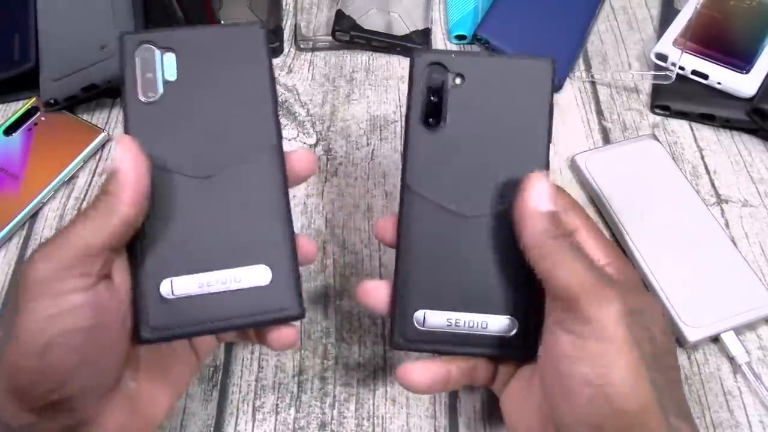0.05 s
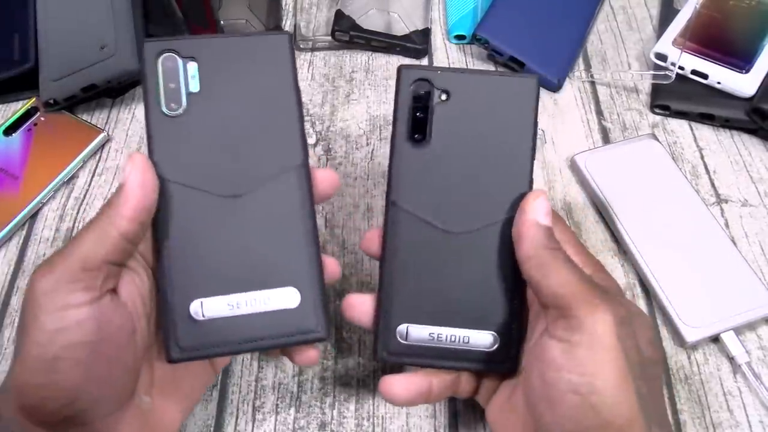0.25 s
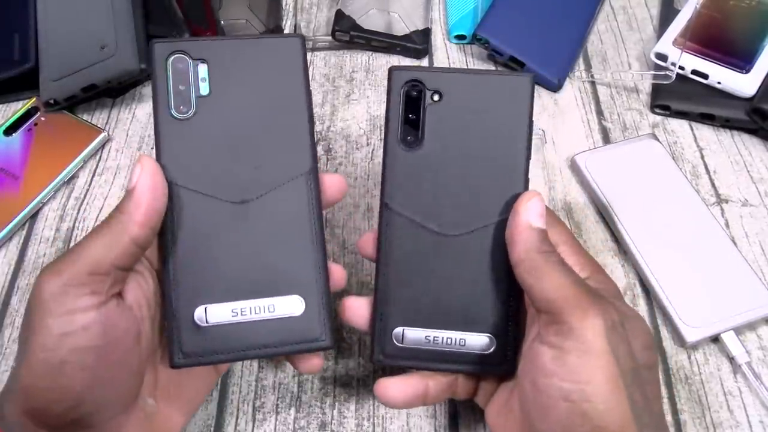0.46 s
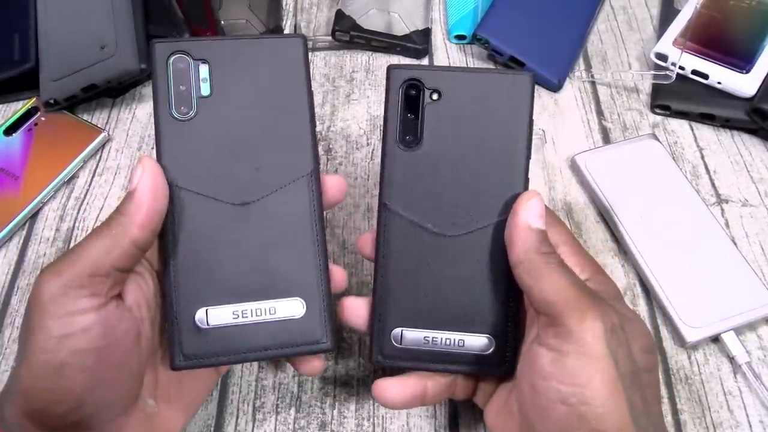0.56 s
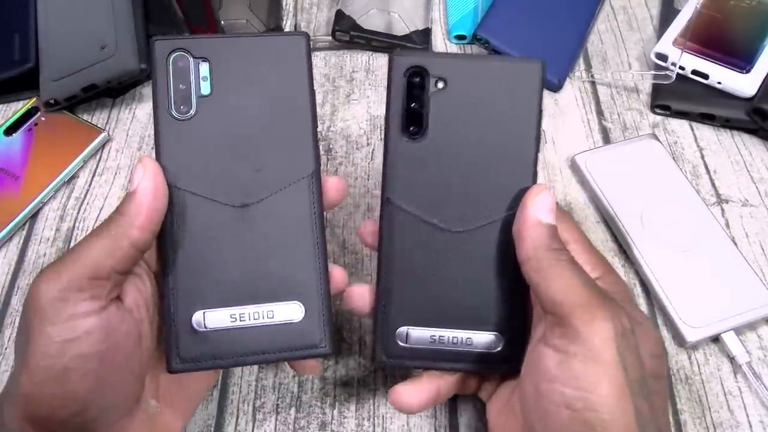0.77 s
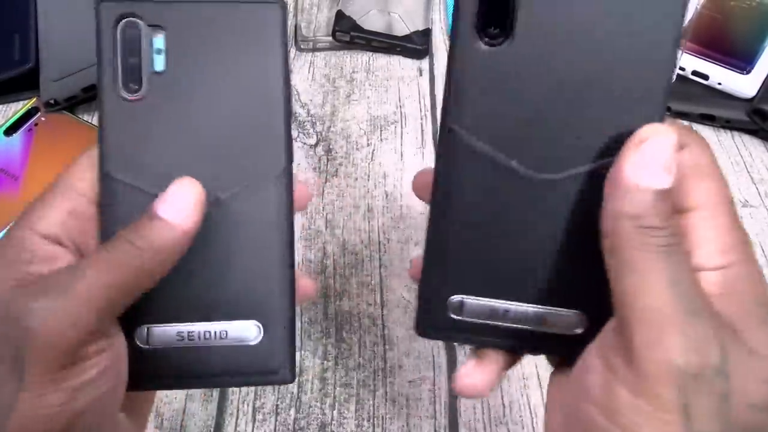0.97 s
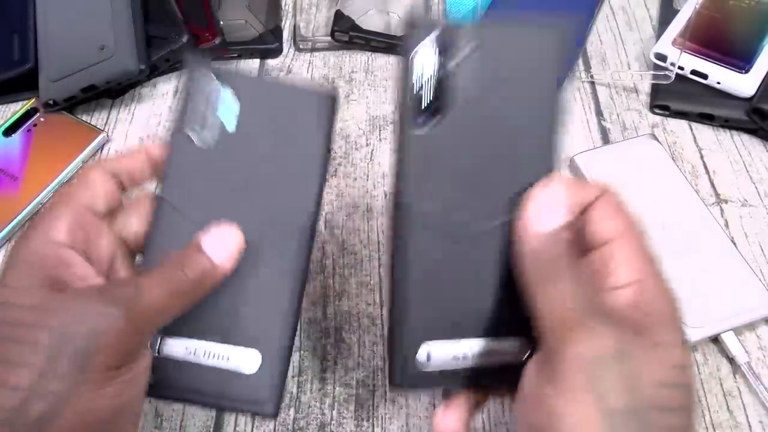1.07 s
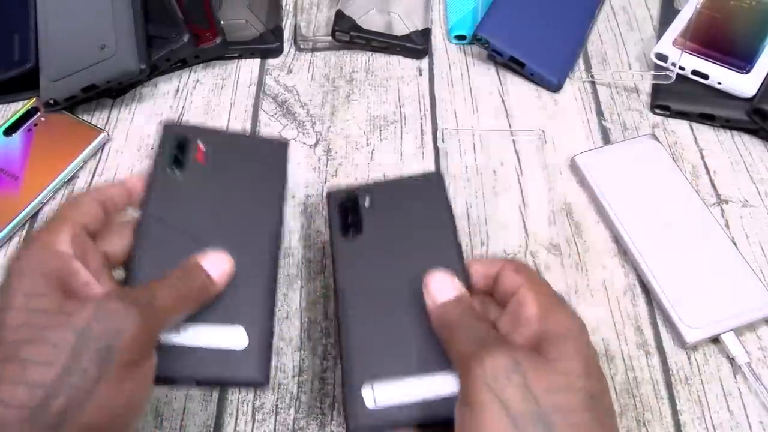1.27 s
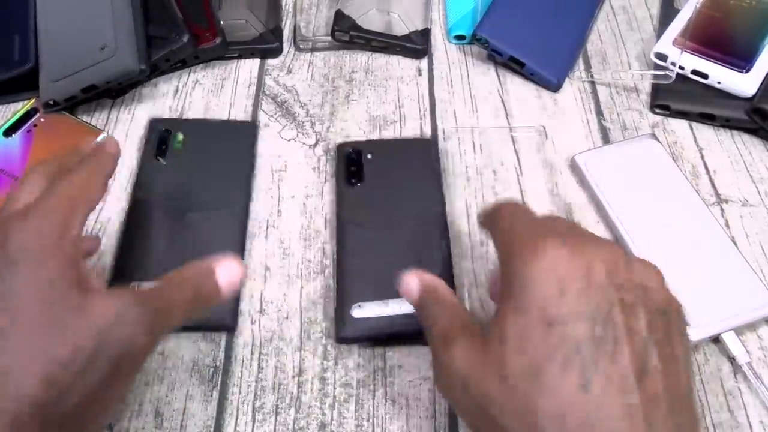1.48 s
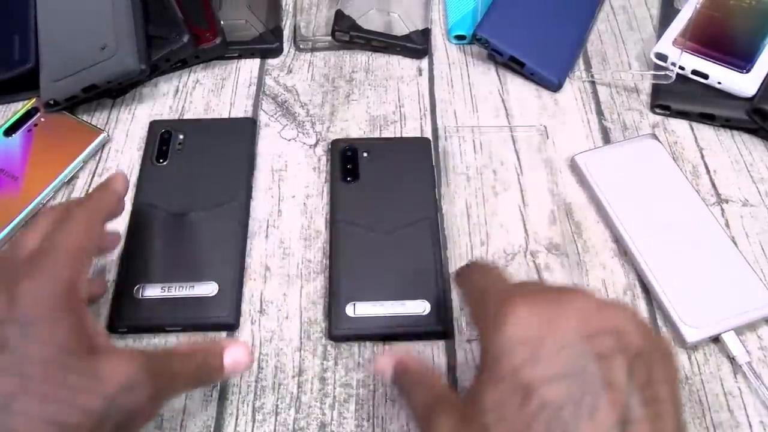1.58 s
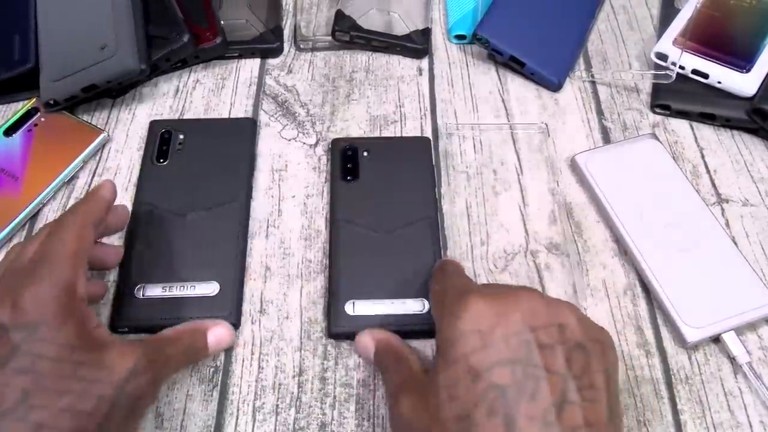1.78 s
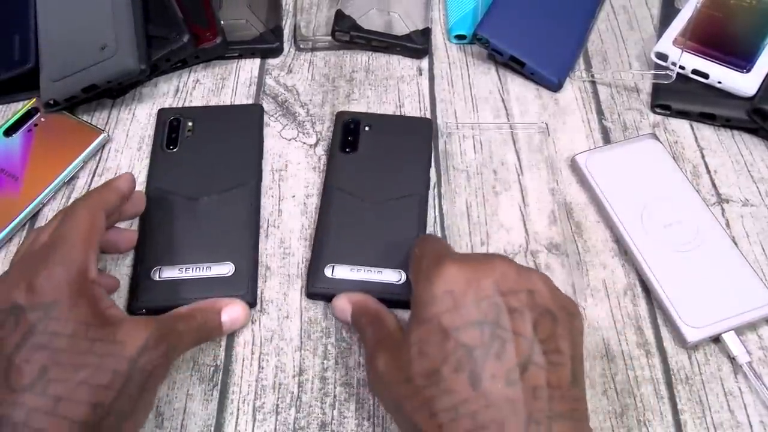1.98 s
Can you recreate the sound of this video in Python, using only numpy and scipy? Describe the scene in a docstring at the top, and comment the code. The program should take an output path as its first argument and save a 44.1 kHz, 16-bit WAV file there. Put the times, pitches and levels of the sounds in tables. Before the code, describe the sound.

Two cased phones thump onto a wooden table, close up in a small, quiet room. First come faint plastic ticks and finger rubs, with two soft vibration buzzes around 0.4 to 0.6 seconds. Small creaks and light touches follow near 1 second. At 1.5 seconds one phone drops with a loud, rattling thump, the other right behind. A low wobble and faint metallic ring linger as fingers slide off.

```python
"""Close up in a small, quiet room, two phones in plastic cases tick and rub as hands turn them over.
One gives a double buzz of its vibration motor. They are lowered to a wooden table and touch it lightly.
At 1.5 s one slips from the fingers and drops flat with a rattling thump, and the other follows;
a limiter ducks the blows. The microphone stand wobbles, a faint metallic ring lingers,
and fingers slide off the cases."""
import sys
import numpy as np
from scipy import signal
from scipy.fft import rfft, irfft, next_fast_len
from scipy.io import wavfile
from scipy.ndimage import uniform_filter1d

SR = 44100
rng = np.random.default_rng(int(sys.argv[2]) if len(sys.argv) > 2 else 0)


def int16_out(signal):
    """Quantize to a 16-bit WAV file."""
    q = np.round(np.clip(np.atleast_2d(signal).T, -1, 1) * 32767)
    wavfile.write(sys.argv[1], SR, q.astype(np.int16))


N = 89831
T = np.arange(N) / SR


def from_db(db):
    """Decibels to gain."""
    return 10 ** (np.asarray(db) / 20)


def unit_rms(x):
    """Scale to rms 1."""
    return x / np.sqrt(np.mean(x ** 2) + 1e-20)


def equalise(x, curve):
    """Minimum-phase EQ along a (Hz, dB) curve."""
    size = next_fast_len(2 * len(x))
    hz, db = np.transpose(curve)
    grid = np.maximum(np.fft.rfftfreq(size, 1 / SR), 1)
    gain = from_db(np.interp(np.log(grid), np.log(hz), db))
    cepstrum = irfft(np.log(gain), size)
    cepstrum[1:size // 2] *= 2   # folded onto positive time: no pre-ring
    cepstrum[size // 2 + 1:] = 0
    return irfft(rfft(x, size) * np.exp(rfft(cepstrum)), size)[:len(x)]


def bandpass(x, hz, width_hz):
    """One resonance with gain 1 at its peak."""
    r = np.exp(-np.pi * width_hz / SR)
    feedback = [1, -2 * r * np.cos(2 * np.pi * hz / SR), r * r]
    return signal.lfilter(np.array([1, 0, -1]) * (1 - r * r) / 2, feedback, x)


def shaped_noise(curve):
    """Noise through an EQ curve and a 16 Hz low cut; rms 1."""
    low_cut = signal.butter(2, 16, "high", fs=SR, output="sos")
    return unit_rms(signal.sosfilt(low_cut, equalise(rng.standard_normal(N), curve)))


def band(x, hz, width_hz):
    """Two passes through the same resonance; rms 1."""
    return unit_rms(bandpass(bandpass(x, hz, width_hz), hz, width_hz))


def decay(start, t60):
    """Envelope that jumps to 1 and dies away."""
    return (T >= start) * from_db(-60 * np.clip((T - start) / t60, 0, 10))


def swell(peak, rise, fall):
    """Round-topped envelope, 9 dB down at `rise` seconds before its peak and `fall` seconds after."""
    return np.exp(-np.abs((T - peak) / np.where(T < peak, rise, fall)) ** 1.71)


# Tone of the background bed: (frequency [Hz], relative level [dB])
ROOM_TONE_EQ = [(12, -24), (20, 1), (70, -10), (113, -7), (270, -17.5), (513, -29.5), (718, -29.5),
                (825, -38), (1060, -32), (1960, -38.5), (16000, -45)]


def room_tone():
    """A low, steady bed of noise with a faint whine."""
    whine = from_db(-72.5) * np.sin(2 * np.pi * 748 * T)
    return from_db(-51) * shaped_noise(ROOM_TONE_EQ) + whine


# Ticks of the cases: (time [s], level [dB], centre [Hz])
CASE_TICKS = [(0.0176, -32.5, 8800), (0.2259, -39, 3200), (0.274, -39.5, 1900), (0.2746, -36.5, 4750),
              (0.832, -47, 4630), (0.9286, -32, 4370), (0.9341, -31, 4300), (.9390, -40, 6470),
              (.9445, -42, 5470), (0.966, -37, 1940), (1.0427, -37, 5170), (1.1055, -39.5, 7400),
              (1.635, -36.5, 3320)]


def case_ticks():
    """Tiny broad snaps of a case shifting against its phone; a quick run of them is a creak."""
    snap = rng.standard_normal(N)
    return sum(from_db(db) * band(snap, hz, width_hz=1.1 * hz) * decay(start, t60=0.006)
               for start, db, hz in CASE_TICKS)


# Finger strokes on a case: (peak time [s], level [dB], rise [s], fall [s], tilt [dB/octave])
STROKES = [(.05, -52.5, 0.061, 0.042, 1.6), (0.189, -58, 0.1, 0.15, -2.5),
           (0.924, -44, 0.056, 0.071, -0.53), (1.05, -56, 0.05, 0.082, -4.5),
           (1.146, -46, 0.018, 0.033, -0.5), (1.331, -52, 0.19, 0.09, -2), (1.415, -60, 0.019, 0.013, 1),
           (1.498, -51, 0.025, 0.018, 1), (1.79, -52.5, 0.091, 0.1, -3), (1.9, -49, 0.041, 0.021, -3),
           (1.978, -44.5, 0.058, 0.027, -1.6), (2.03, -42, .035, 0.077, -4.5)]
# Tone of skin on plastic: (frequency [Hz], relative level [dB])
SKIN_EQ = [(100, -3.5), (430, 5), (750, -4.5), (1300, 0.5), (2200, -0.5), (3700, -0.5), (5000, 1),
           (7500, -2), (10500, 1), (13000, -4), (15800, -9.5)]
SLIPS_PER_S, SLIP_SPREAD_DB, SLIP_MIX, FLUTTER_DB = 1500, 2, 0.73, 2.5


def finger_rubs():
    """Skin friction: fluttering hiss and a grain of tiny slips swell with each stroke."""
    slips = (rng.random(N) < SLIPS_PER_S / SR) * rng.choice([-1, 1], N)
    slips = slips * from_db(SLIP_SPREAD_DB * np.minimum(rng.exponential(1, N), 4))
    wander = unit_rms(uniform_filter1d(rng.standard_normal(N), size=500))
    friction = from_db(FLUTTER_DB * wander) * (rng.standard_normal(N) + SLIP_MIX * unit_rms(slips))
    rubs = 0
    for peak, db, rise, fall, tilt in STROKES:
        curve = [(hz, level + tilt * np.log2(hz)) for hz, level in SKIN_EQ]
        rubs = rubs + from_db(db) * swell(peak, rise, fall) * unit_rms(equalise(friction, curve))
    return rubs


# Tone of the reverb: (frequency [Hz], relative level [dB])
REVERB_EQ = [(40, -29), (120, -8), (450, -2), (1000, -4.5), (4000, -12), (16000, -10.5)]


def room_reverb(x):
    """Short diffuse reflections of a furnished room, wet only."""
    tail = shaped_noise(REVERB_EQ) * decay(start=0.005, t60=0.12)
    return from_db(-15.5) * signal.fftconvolve(x, tail / np.sqrt(np.sum(tail ** 2)))[:N]


# Pulses of the motor: (time [s], length [s])
MOTOR_PULSES = [(0.398, 0.082), (0.516, 0.0834)]
# Its harmonics: (harmonic number, relative level [dB])
MOTOR_HARMONICS = [(1, -1.5), (2, -21), (3, -27)]
MOTOR_HZ, MOTOR_RAMP_S = 158, 0.016


def motor_buzz():
    """Two steady pulses of a vibration motor, with a faint rattle once a cycle."""
    gate = sum(np.clip((T - start) / MOTOR_RAMP_S, 0, 1)
               * np.clip((start + length - T) / MOTOR_RAMP_S + 0.5, 0, 1)
               for start, length in MOTOR_PULSES)
    phase = 2 * np.pi * MOTOR_HZ * T
    tone = sum(from_db(db) * np.sin(k * phase) for k, db in MOTOR_HARMONICS)
    pulsed_noise = rng.standard_normal(N) * np.maximum(np.sin(phase), 0)
    rattle = unit_rms(bandpass(pulsed_noise, hz=1900, width_hz=470))
    return gate * (from_db(-40.5) * tone + from_db(-71) * rattle)


# Hands jostle the table: (peak time [s], level [dB], rise [s], fall [s])
HAND_MOVES = [(1.061, -45, 0.15, 0.22), (2.0, -39.5, 0.34, .05)]
# Tone of their rumble: (frequency [Hz], relative level [dB])
RUMBLE_EQ = [(20, -4), (40, 13), (70, -18), (120, -16), (200, -14), (350, -23), (700, -20), (2000, -64)]


def hand_rumble():
    """Dull rumble as hands and wrists move on the table."""
    envelope = sum(from_db(db) * swell(peak, rise, fall) for peak, db, rise, fall in HAND_MOVES)
    return shaped_noise(RUMBLE_EQ) * envelope


# Cases hit the table: (time [s], thump drive [dB], contact cut-off [Hz], clack [dB], stand drive [dB])
HITS = [(0.963, -48.5, 800, -37, -61), (1.124, -40.5, 900, -56, -61), (1.1298, -38.5, 910, -50, -55),
        (1.1872, -35.5, 1000, -39, -26), (1.5060, 7, 414, -11, -43), (1.5249, 4.5, 1130, -5, -28),
        (1.5323, -39, 894, -32.5, 3), (1.541, 3.5, 1400, -5, -31.5), (1.5481, 12.5, 120, -32, -2.5),
        (1.5802, -2, 203, -31.5, -13), (1.6150, -13.5, 214, -69, -29), (1.6293, -12.5, 391, -46, -40.3),
        (1.6343, -0.5, 640, -25.5, -55), (1.6419, -11.5, 816, -37, -3), (1.6733, -4.5, 135, -67, -38),
        (1.93, -25.5, 99, -79, -55)]


def contact_forces():
    """One force pulse of unit area per hit; a softer contact lasts longer and sounds duller."""
    age = np.array([np.clip((T - start) * 2 * np.pi * hz, 0, 60) for start, _, hz, _, _ in HITS])
    pulses = age * np.exp(-age)
    return pulses / pulses.sum(axis=1, keepdims=True)


def ring(force, hz, t60):
    """One mode: a unit click starts a decaying sine of height 1."""
    r, w = from_db(-60 / (t60 * SR)), 2 * np.pi * hz / SR
    return signal.lfilter([0, np.sin(w)], [1, -2 * r * np.cos(w), r * r], force + 1e-18)


# Modes of the wooden top: (frequency [Hz], gain [dB], t60 [s])
TOP_MODES = [(144, -9.5, 0.11), (193.7, -13.5, 0.15), (235, 8, 0.039), (261.7, -21.5, 0.33),
             (285.9, 6, 0.065), (370.6, -0.5, 0.077), (420, -15.5, 0.16), (457, -8.5, 0.095),
             (679, -19.5, 0.033), (832, -19, 0.104), (949, -23.5, 0.098), (1100, -17.5, 0.027)]


def table_thumps(forces):
    """Each hit rings the tabletop, with a slightly different balance of modes."""
    drive_db = np.array([db for _, db, _, _, _ in HITS])
    scatter_db = rng.normal(0, 1, (len(HITS), len(TOP_MODES)))
    return -sum(ring(from_db(drive_db + db + scatter) @ forces, hz, t60)
                for (hz, db, t60), scatter in zip(TOP_MODES, scatter_db.T))


# Low modes of the shaken microphone stand: (frequency [Hz], gain [dB], t60 [s])
STAND_MODES = [(33, -1, 0.57), (57.2, 1.5, 0.18), (88, -6.5, 0.16), (120, -16.5, 0.6)]


def stand_sway(forces):
    """The hits shake the microphone stand: a deep, slowly fading wobble under the thumps."""
    push = from_db([db for *_, db in HITS]) @ forces
    return -sum(from_db(db) * ring(push, hz, t60) for hz, db, t60 in STAND_MODES)


# A phone settles after landing: (time [s], level [dB])
SETTLES = [(1.5245, -23.5), (1.5393, -31.5), (1.6321, -37)]
# Tone of the plastic: (frequency [Hz], relative level [dB])
PLASTIC_EQ = [(300, 5.5), (900, 0.5), (1600, -2), (2500, -6), (4500, -13.5), (8000, -18), (12000, -23),
              (16000, -35.5)]


def case_clacks():
    """The plastic cracks briefly at each hit and chatters as it settles."""
    def burst(start, db, t60, attack_s=0.0005):
        return from_db(db) * decay(start, t60) * np.clip((T - start) / attack_s, 0, 1)
    cracks = sum(burst(start, db, t60=0.012) for start, _, _, db, _ in HITS)
    chatter = sum(burst(start, db, t60=0.21) for start, db in SETTLES)
    return (cracks + chatter) * shaped_noise(PLASTIC_EQ)


# Fingertip squeaks: (peak time [s], level [dB])
FINGER_SQUEAKS = [(1.480, -49), (1.495, -51)]


def finger_squeaks():
    """A fingertip sticks and slips in brief chirps as the phone leaves the hand."""
    envelope = sum(from_db(db) * swell(peak, rise=0.0036, fall=0.0036) for peak, db in FINGER_SQUEAKS)
    return band(rng.standard_normal(N), hz=3250, width_hz=400) * envelope


def metallic_zing():
    """A faint metallic ring, a narrow band of noise, lingers after each landing."""
    envelope = sum(decay(start, t60=2.1) for start, _ in SETTLES)
    return from_db(-65) * band(rng.standard_normal(N), hz=1620, width_hz=520) * envelope


def scene():
    """Mono mix: thumps, clacks and finger noises feed the reverb; the other layers stay dry."""
    forces = contact_forces()
    foley = table_thumps(forces) + case_clacks() + case_ticks() + finger_rubs() + finger_squeaks()
    ambience = room_tone() + room_reverb(foley)
    return (foley + ambience + stand_sway(forces) + metallic_zing() + motor_buzz() + hand_rumble())[None]


THRESHOLD_DB, RELEASE_DB_PER_S, ATTACK_S, LOOK_AHEAD_S = 4, 35, 0.00049, 0.0006


def record(dry):
    """Low cut, a limiter that ducks at the hits, a soft clip on the peaks that get through, high cut."""
    low_cut = signal.butter(1, 8, "high", fs=SR, output="sos")
    high_cut = signal.ellip(10, 0.1, 80, 15800, fs=SR, output="sos")
    dry = signal.sosfilt(low_cut, dry)
    over_db = np.maximum(20 * np.log10(np.abs(dry[0]) + 1e-9) - THRESHOLD_DB, 0)
    held_db = np.maximum.accumulate(over_db + RELEASE_DB_PER_S * T) - RELEASE_DB_PER_S * T
    pole = np.exp(-1 / (ATTACK_S * SR))
    smooth_db = signal.lfilter([1 - pole], [1, -pole], held_db)
    duck_db = np.interp(T + LOOK_AHEAD_S, T, smooth_db)
    limited = dry * from_db(-duck_db)
    rounded = limited / (1 + limited ** 4) ** (1 / 4)
    return signal.sosfilt(high_cut, rounded)


dry = scene()
out = record(dry)
int16_out(out)
```